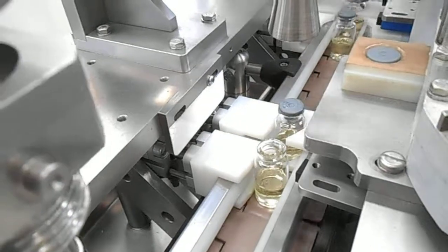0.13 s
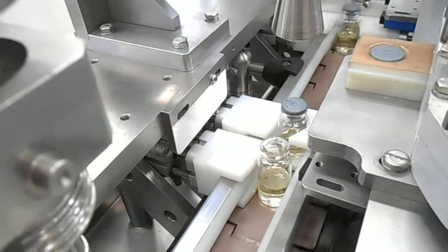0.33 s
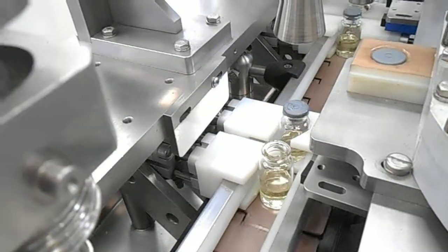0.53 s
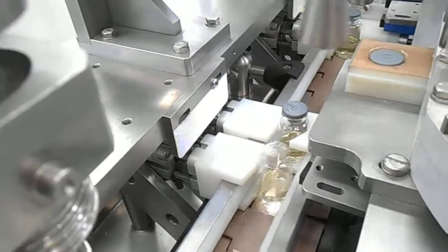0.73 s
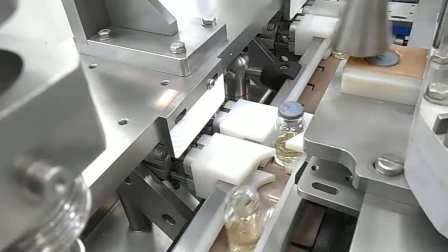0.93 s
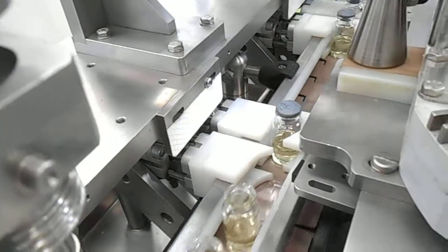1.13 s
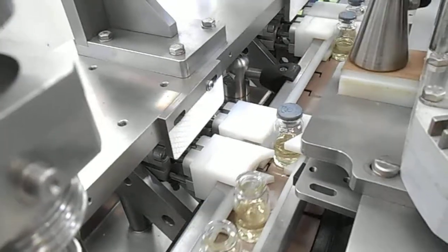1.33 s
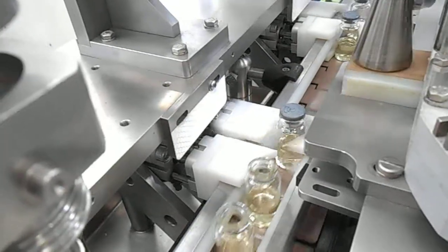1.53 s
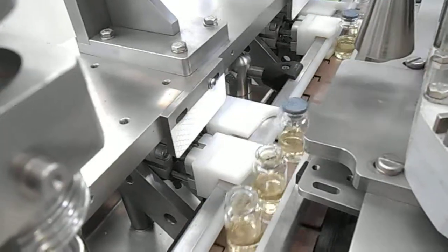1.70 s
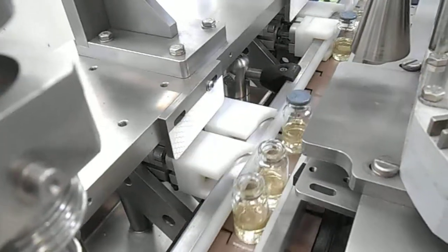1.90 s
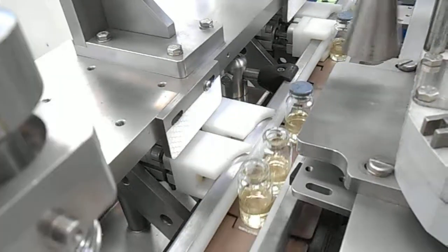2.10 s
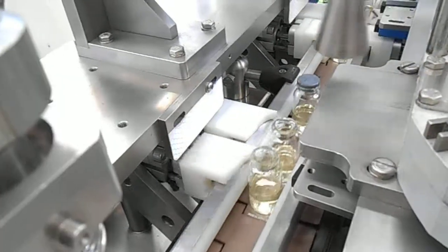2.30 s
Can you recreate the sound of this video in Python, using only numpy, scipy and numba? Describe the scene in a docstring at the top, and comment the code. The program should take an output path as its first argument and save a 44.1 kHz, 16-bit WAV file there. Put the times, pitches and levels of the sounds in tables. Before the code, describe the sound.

A vial capping machine clacks and thuds close up over a steady hum and hiss, with a short factory echo. Knocks cluster around 0.3 seconds, air vents at 0.6, and more knocks land at 0.8. From 1.0 to 1.3, hard blows, ringing steel and clinking glass vials overlap. Sharp clacks hit at 1.4 and 1.6, then lighter knocks near 1.9 and 2.1, with a faint whistling air leak.

```python
"""One cycle of a vial filling and capping machine, close up. The drive hums and vials tick throughout.
From 0.1 s air seeps, slides and grippers knock on the steel frame, latches snap and heavy parts thud.
At 0.56 s a valve vents. From 1 s a leak whistles, a steel plate rings, glass vials clink and scrape.
At 1.44 s the capping head hits its stop; more knocks follow, and the leak returns near 2 s.
The hall adds a short tail; a fast limiter flattens the hardest blows."""
import sys
import numpy as np
from scipy import signal
from scipy.fft import rfft, irfft, next_fast_len
from scipy.io import wavfile
from scipy.ndimage import uniform_filter1d, minimum_filter1d
from numba import njit

SR = 44100
rng = np.random.default_rng(int(sys.argv[2]) if len(sys.argv) > 2 else 0)


def transcribe(signal):
    """Save signal, clipped to [-1, 1], as a 16-bit WAV file at the path in sys.argv[1]."""
    frames = np.atleast_2d(signal).T
    limited = np.clip(frames, -1, 1)
    pcm = np.round(limited * 32767).astype(np.int16)
    wavfile.write(sys.argv[1], SR, pcm)


N = 103635
T = np.arange(N) / SR

# running noise: time_s, bass_db, low_mids_db, upper_mids_db, treble_db
RUNNING_LEVELS = [(0.0, -38, -45.5, -40, -45.5), (0.14, -35.5, -32, -28.5, -37),
                  (0.25, -35, -35, -31.5, -37.5), (0.37, -33.5, -35.5, -31.5, -44),
                  (0.59, -37.5, -34.5, -37, -37), (0.72, -32.5, -33, -26.5, -30),
                  (0.98, -35.5, -34, -28.5, -34), (1.118, -32, -34, -16.5, -29),
                  (1.21, -45, -51, -31.5, -47), (1.3, -40, -47, -29.5, -46.5), (1.42, -42, -45, -29.5, -48),
                  (1.51, -40, -47.5, -38, -53), (1.64, -48, -57.5, -51.5, -62),
                  (1.86, -43.5, -44.5, -40.5, -43.5), (1.96, -36, -43.5, -44, -44),
                  (2.052, -44, -37.5, -33.5, -40.5), (2.25, -36.5, -39.5, -37.5, -40.5),
                  (2.35, -32.5, -34.5, -31.5, -34.5)]
# spectra of those four bands: freq_hz, gain_db
BASS_SPECTRUM = [(15, 3), (40, -1.5), (85, 2.5), (130, -1), (200, 3.5), (280, -0.5), (500, -32.5),
                 (3000, -54)]
LOW_MID_SPECTRUM = [(150, -4), (320, 3), (480, 1), (780, 1.5), (1050, -5.5), (1600, -7), (3000, -38),
                    (9000, -61)]
UPPER_MID_SPECTRUM = [(600, -16.5), (1200, 0.5), (1700, 8.5), (2500, 8), (4300, 9.5), (5500, 2),
                      (8000, -50)]
TREBLE_SPECTRUM = [(3000, -14), (5000, 3.5), (6300, 8), (8300, 1), (10300, -6.5), (11500, -27),
                   (13000, -37)]
# drive tones, relative to the low mids: pitch_hz, width_hz, level_db
HUM_TONES = [(205.9, 9.5, -2.5), (491, 27, -5.5), (684.6, 8.9, -11.5), (768.7, 18.6, -5.5)]

# vial on vial: start_s, level_db
CLINKS = [(1.0765, 13), (1.1385, 3.5), (1.227, -3), (1.256, -16), (1.2805, -17), (1.324, -8), (1.340, -22),
          (1.756, -34.5)]
# vial modes: pitch_hz, level_db, t60_s
GLASS_MODES = [(3950, -1.5, 0.015), (4026, -7.5, 0.03), (4480, -10, 0.015), (5200, -9, 0.014),
               (6230, -15, 0.02), (7780, -9.5, 0.01), (9350, -7.5, 0.0084)]
# vials on the rail: start_s, end_s, level_db
SCRAPES = [(1.304, 1.324, -20.5), (1.365, 1.408, -31.5)]
# scrapes and ticks: freq_hz, gain_db
SCRAPE_SPECTRUM = [(500, -8), (1600, 5), (2600, -6), (4000, 7), (6200, 11.5), (8000, -4), (10000, -11),
                   (12500, -54)]

# slow seeps, valve vents, thin leaks: start_s, end_s, level_db
SEEPS = [(.11, .33, -30.5), (.36, .98, -51)]
VENTS = [(.56, .651, -23)]
LEAKS = [(1.0, 1.012, -23.5), (2.03, 2.19, -45), (2.195, 2.35, -37.5)]
# valve port resonances: centre_hz, width_hz, level_db
PORT_RESONANCES = [(2970, 400, -6.5), (4465, 290, 1), (7730, 660, -6.5), (8200, 360, -2.5)]
# broad rush of a vent: freq_hz, gain_db
RUSH_SPECTRUM = [(300, -11), (1500, 4.5), (3000, -3.5), (6000, 3), (10300, 0), (12500, -25)]

# slides and grippers, and two valve clicks at 0.546 and 0.553 s: start_s, clack_db, click_db, snap_db, t60_s
KNOCKS = [(.1665, -25, -23.5, -32, 0.035), (0.2632, -22.5, -19.5, -32, 0.11), (0.268, -18, -16, -37, 0.06),
          (0.2965, -11.5, -14, -25, 0.048), (.305, -14.5, -19.5, -36, 0.044), (0.313, -23, -22, -34, 0.076),
          (0.546, -34, -24, -25, 0.021), (0.553, -38, -30, -31, 0.033), (.761, -17, -11, -30, 0.029),
          (.770, -17, -13.5, -43, 0.17), (0.794, -19, -14.5, -28.5, 0.098),
          (1.034, -18.5, -9.5, -22, 0.091), (1.06, -29, -12, -39, 0.033), (1.0747, -7.5, -5, -15, 0.056),
          (1.084, -15, -11, -32, 0.053), (1.104, -31, -9.5, -26, 0.062), (1.138, -38, 2.5, -21, 0.0098),
          (1.161, -33, -20, -27, 0.017), (1.186, -47, -23.5, -38, 0.075), (1.22, -25, -19, -23, 0.024),
          (1.254, -29, -20.5, -40, 0.021), (1.3668, -34, -22, -48, 0.027), (1.438, -16, -4, -25, 0.0094),
          (1.443, -9, -5, -11.5, 0.018), (1.587, -33, -32, -48, 0.21), (1.6074, -6.5, -6, -14, 0.021),
          (1.65, -56, -33, -50, 0.19), (1.894, -26.5, -25.5, -31.5, 0.084),
          (2.0516, -27.5, -21.5, -14.5, 0.02)]
# mid, treble and high-treble bands of a knock: freq_hz, gain_db
CLACK_SPECTRUM = [(300, -8.5), (700, -7.5), (1000, 0), (1400, 0.5), (1900, 2), (2400, -3.5), (3500, -19.5),
                  (8000, -42)]
CLICK_SPECTRUM = [(800, -40), (2200, -1.5), (3400, 3.5), (5000, 4.5), (6500, -3), (8500, -7.5),
                  (12500, -62.5)]
SNAP_SPECTRUM = [(1000, -16), (5000, 3), (7000, 5), (8300, 5.5), (10000, 5.5), (12500, -21)]
# steel latches: start_s, lower_hz, upper_hz, level_db
LATCHES = [(0.167, 1020, 4930, -14.5), (0.7694, 2510, 3370, -5), (0.776, 2370, 3540, -7),
           (1.035, 3330, 5500, -6.5), (1.104, 4000, 4940, -11), (1.607, 1840, 5260, -10.5),
           (1.8964, 2340, 4860, -14), (2.0527, 3200, 4700, -13)]

# heavy parts landing: start_s, level_db, pitch_hz, t60_s
THUDS = [(.262, -11, 703, 0.029), (.270, -11.5, 330, 0.024), (.293, -13, 589, 0.074),
         (.299, -6.5, 610, 0.068), (.305, -8, 378, .06), (.313, -9, 466, 0.08), (.793, -10, 615, 0.065),
         (.801, -17.5, 360, 0.057), (.806, -15.5, 507, 0.14), (1.085, -7.5, 426, 0.058),
         (1.105, -14, 312, 0.044), (1.4195, -16.5, 852, 0.058), (1.436, -16, 490, 0.058),
         (1.59, -27, 553, 0.11), (1.6076, -22, 383, 0.048), (1.894, -21, 758, 0.079),
         (1.8958, -17.5, 499, 0.05), (1.894, -19.5, 984, 0.044), (2.052, -18, 470, .025)]
# frame modes: pitch_hz, level_db, t60_s
FRAME_MODES = [(326, -4, 0.04), (403, 1.5, 0.068), (462.6, 0.5, 0.13), (516.4, 8.5, 0.037), (610, 4, 0.045),
               (733, 8.5, 0.022), (977, 1, 0.034)]
# blows on the plate, heavy stops on the base, capping head on its stop: start_s, level_db
PLATE_BLOWS = [(1.058, -23.5), (1.077, -25.5), (1.107, -15.5), (2.068, -37)]
THUMPS = [(1.083, -24.5), (2.066, -24.5)]
HEAD_BLOWS = [(1.4445, 11)]
# plate and capping head modes: pitch_hz, level_db, t60_s
PLATE_MODES = [(1666, 5.5, 0.1), (2007, 0.5, 0.086), (3720, -4.5, 0.21)]
HEAD_MODES = [(3296, -4.5, 0.025), (4100, -5.5, 0.014), (4700, -13, 0.021), (6340, -12, 0.015)]
# shaking base, hall tail: freq_hz, gain_db
THUMP_SPECTRUM = [(20, -17), (45, 6), (85, 0), (150, -2.5), (330, -12), (600, -25), (3000, -82)]
HALL_SPECTRUM = [(100, 17.5), (600, 4.5), (2000, -5), (6000, -10.5), (12000, -5.5)]


def amp(db):
    return 10 ** (np.asarray(db) / 20)


def unit_rms(x):
    return x / np.sqrt(np.mean(x ** 2))


def noise():
    return rng.standard_normal(N)


def convolve(x, response):
    return signal.fftconvolve(x, response)[:N]


def add_at(track, start_s, sound):
    i = int(start_s * SR)
    track[i:i + len(sound)] += sound[:N - i]


def decay(start_s, t60_s):
    """Step onset, exponential fall."""
    return (T >= start_s) * np.exp(-np.log(1000) * np.clip((T - start_s) / t60_s, 0, 10))


def gates(rows, attack_s, release_s):
    """Linear rise, hold and exponential release per row."""
    return sum(amp(db) * np.clip((T - start_s) / attack_s, 0, 1)
               * np.exp(-np.clip((T - end_s) / release_s, 0, 20)) for start_s, end_s, db in rows)


def colour(x, spectrum, size=4096):
    """Minimum-phase filter; white noise keeps its power."""
    hz, db = np.array(spectrum).T
    bins_hz = np.fft.rfftfreq(size, 1 / SR)
    log_gain = np.log(amp(np.interp(np.log(bins_hz + 1), np.log(hz), db)))
    cepstrum = irfft(log_gain)[:size // 2]
    cepstrum[0] = 0
    response = irfft(np.exp(rfft(2 * cepstrum, size)))
    return convolve(x, response / np.linalg.norm(response))


def resonant_noise(centre_hz, width_hz):
    """Noise in one steep-sided resonance, rms 1."""
    size = next_fast_len(N)
    detune = 2 * (np.fft.rfftfreq(size, 1 / SR) - centre_hz) / width_hz
    return unit_rms(irfft(rfft(noise(), size) / (1 + detune ** 2 / 2), size)[:N])


def grainy_noise(depth):
    """Noise with a fluttering level, rms 1."""
    flutter = resonant_noise(0, width_hz=250)
    return unit_rms(noise() * np.exp(depth * flutter))


def ring(modes, contact_s=0.00062):
    """Damped modes after one tap, building over the contact time."""
    tones = sum(amp(db) * decay(0, t60_s) * np.sin(2 * np.pi * hz * T) for hz, db, t60_s in modes)
    return (1 - np.exp(-T / contact_s)) * tones


def struck(blows, modes):
    """The same modes ring at every blow."""
    response, out = ring(modes), np.zeros(N)
    for start_s, db in blows:
        add_at(out, start_s, amp(db) * response)
    return out


def rattle(t60_s, attack_s=0.00045, size=8192):
    """Tiny contacts as a dying noise burst with a flattened spectrum."""
    t = T[:size]
    onset = np.clip(t / attack_s, 0, 1)
    envelope = onset * np.exp(-np.log(1000) * t / t60_s)
    spectrum = rfft(rng.standard_normal(size) * envelope, 2 * size)
    smooth_power = uniform_filter1d(abs(spectrum) ** 2, size=25)
    burst = onset * irfft(spectrum / np.sqrt(smooth_power))[:size]
    return burst * np.linalg.norm(envelope) / np.linalg.norm(burst)


def drive(motor_db=-58, upper_trim_db=-6, treble_trim_db=-0.5, grain=0.21):
    """Wavering drive and motor tones in the rumble and hiss of the running line."""
    times_s, *levels_db = np.array(RUNNING_LEVELS).T
    bass, low, upper, treble = (amp(np.interp(T, times_s, db)) for db in levels_db)
    hum = sum(amp(db) * resonant_noise(hz, width_hz) for hz, width_hz, db in HUM_TONES)
    rumble = bass * colour(noise(), BASS_SPECTRUM) + low * (hum + colour(noise(), LOW_MID_SPECTRUM))
    mid_hiss = upper * amp(upper_trim_db) * colour(grainy_noise(grain), UPPER_MID_SPECTRUM)
    motor = amp(motor_db) * resonant_noise(centre_hz=192, width_hz=9.8)
    high_hiss = treble * amp(treble_trim_db) * colour(grainy_noise(grain), TREBLE_SPECTRUM)
    return rumble + motor + mid_hiss + high_hiss


def vials(ticks_per_s=57, tick_db=-38, scatter_db=2):
    """Jostling vials tick faintly, clink glass on glass and scrape along the rail."""
    taps = (rng.random(N) < ticks_per_s / SR) * amp(tick_db + scatter_db * noise())
    ticks = convolve(taps, decay(0, t60_s=0.029))
    scrapes = gates(SCRAPES, attack_s=0.0014, release_s=0.0077)
    friction = colour(grainy_noise(depth=0.3) * (ticks + scrapes), SCRAPE_SPECTRUM)
    return friction + struck(CLINKS, GLASS_MODES)


def air(rush_db=-8, waver_db=2, attack_s=0.0082, release_s=0.006):
    """Compressed air seeps and vents through a resonant port; a leak whistles thinly."""
    port = unit_rms(sum(amp(db) * resonant_noise(hz, width_hz) for hz, width_hz, db in PORT_RESONANCES))
    seep = port * gates(SEEPS, attack_s=0.06, release_s=0.035)
    rush = amp(rush_db) * colour(noise(), RUSH_SPECTRUM)
    vent = (port + rush) * gates(VENTS, attack_s, release_s)
    waver = amp(waver_db * resonant_noise(0, width_hz=32))
    leak = waver * resonant_noise(centre_hz=6470, width_hz=420) * gates(LEAKS, attack_s, release_s)
    return seep + vent + leak


def knocks():
    """Slides and grippers hit the frame and the valve clicks as it opens: a brief rattle in each of three
    bands."""
    bands = np.zeros((3, N))
    for start_s, *levels_db, t60_s in KNOCKS:
        for band, db in zip(bands, levels_db):
            add_at(band, start_s, amp(db) * rattle(t60_s))
    clack, click, snap = bands
    return colour(clack, CLACK_SPECTRUM) + colour(click, CLICK_SPECTRUM) + colour(snap, SNAP_SPECTRUM)


def latches(t60_s=0.016):
    """Each small steel latch snaps with two short tones."""
    return sum(struck([(start_s, db)], [(lower_hz, 0, t60_s), (upper_hz, 0, t60_s)])
               for start_s, lower_hz, upper_hz, db in LATCHES)


def thuds(contact_s=0.00039, frame_db=-4, frame_highpass_hz=214):
    """Each heavy part lands with its own low note and rattles the frame."""
    notes, force = np.zeros(N), np.zeros(N)
    for start_s, db, pitch_hz, t60_s in THUDS:
        age_s = np.maximum(T - start_s, 0)
        envelope = (1 - np.exp(-age_s / contact_s)) * decay(start_s, t60_s)
        notes += amp(db) * envelope * np.sin(2 * np.pi * pitch_hz * age_s)
        add_at(force, start_s, amp(db + frame_db) * rattle(t60_s))
    highpass = signal.butter(2, frame_highpass_hz, "highpass", fs=SR, output="sos")
    frame = signal.sosfilt(highpass, ring(FRAME_MODES))
    return notes + convolve(force, frame / np.linalg.norm(frame))


def plate(shimmer_db=-12.5):
    """The struck steel plate rings; its crowded modes linger as a shimmer."""
    envelope = sum(amp(db + shimmer_db) * decay(start_s, t60_s=0.59) for start_s, db in PLATE_BLOWS)
    shimmer = envelope * resonant_noise(centre_hz=1573, width_hz=110)
    return struck(PLATE_BLOWS, PLATE_MODES) + shimmer


def base_thumps():
    """The heaviest stops shake the base: bursts of low noise."""
    envelope = sum(amp(db) * decay(start_s, t60_s=0.24) for start_s, db in THUMPS)
    return colour(noise() * envelope, THUMP_SPECTRUM)


def capping_head():
    """The head hits its stop and rings briefly."""
    return struck(HEAD_BLOWS, HEAD_MODES)


def hall(direct, level_db=-21, delay_s=0.0066, t60_s=0.39):
    """Reflections as a short, dark noise tail."""
    tail = colour(noise() * decay(delay_s, t60_s), HALL_SPECTRUM)
    return amp(level_db) * convolve(direct, tail / np.linalg.norm(tail))


def scene():
    """Moving parts and air with their hall tail, over the drive; mono."""
    direct = knocks() + thuds() + base_thumps() + vials() + air() + plate() + capping_head() + latches()
    return (direct + hall(direct) + drive())[None]


@njit
def peak_follower(x, retention):
    """Instant attack, exponential release."""
    out, peak = np.empty(len(x)), 0.
    for i in range(len(x)):
        peak = max(abs(x[i]), peak * retention)
        out[i] = peak
    return out


def record(dry):
    """Treble roll-off, fast peak limiter, final low-pass."""
    treble_edge_hz, top_hz = 13050, 16300
    ceiling, release_s = 0.74, 0.0008
    dull = signal.sosfilt(signal.cheby1(10, 0.5, treble_edge_hz, fs=SR, output="sos"), dry[0])
    peak = peak_follower(dull, np.exp(-1 / (release_s * SR)))
    gain = ceiling / np.maximum(peak, ceiling)
    smooth_gain = uniform_filter1d(minimum_filter1d(gain, size=5), size=5)
    lowpass = signal.ellip(8, 0.2, 70, top_hz, fs=SR, output="sos")
    return signal.sosfilt(lowpass, dull * smooth_gain)[None]


dry = scene()
out = record(dry)
transcribe(out)
```